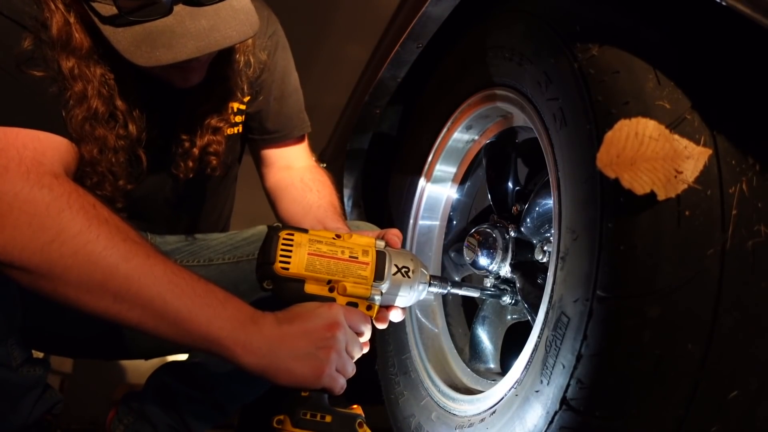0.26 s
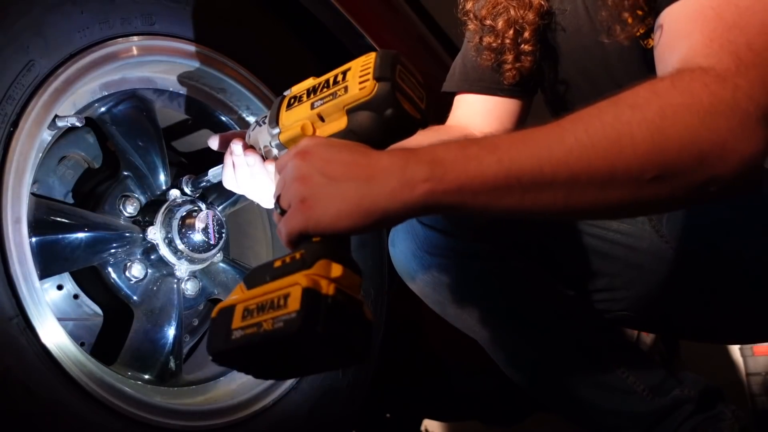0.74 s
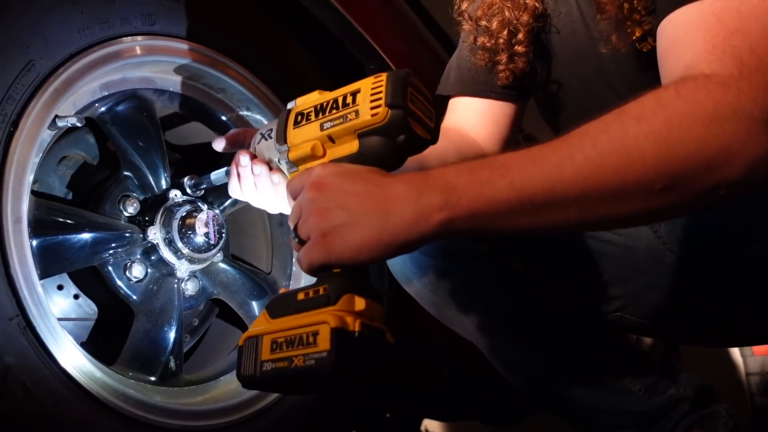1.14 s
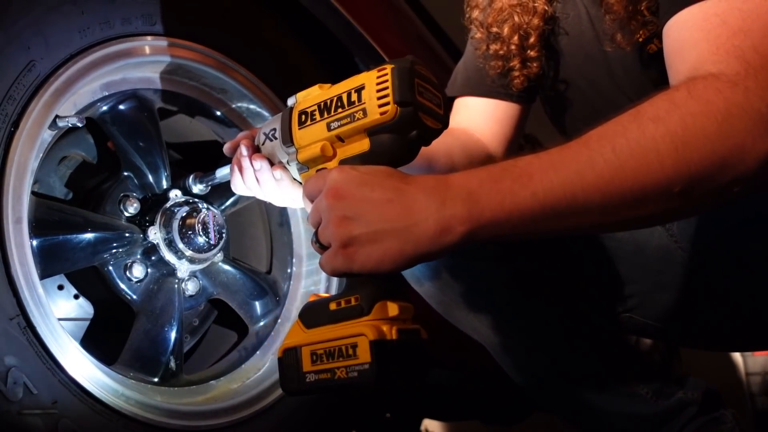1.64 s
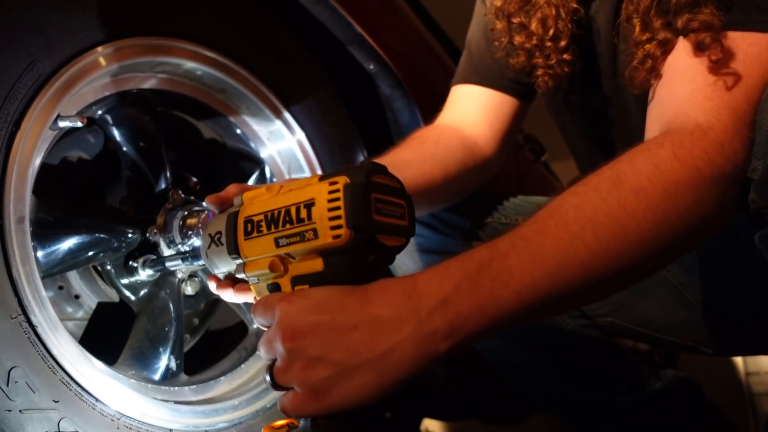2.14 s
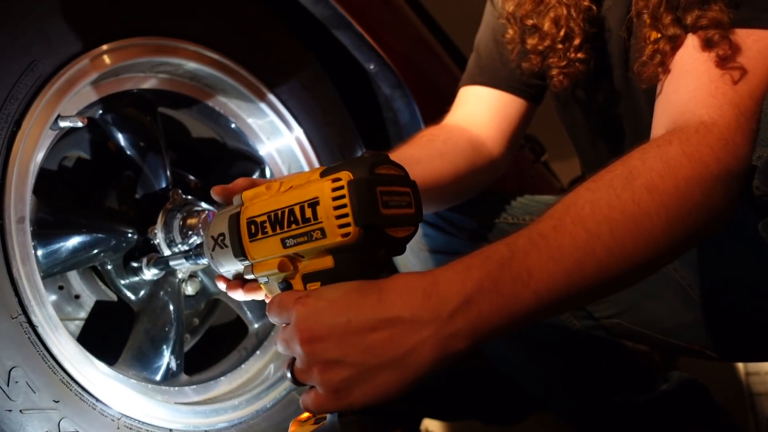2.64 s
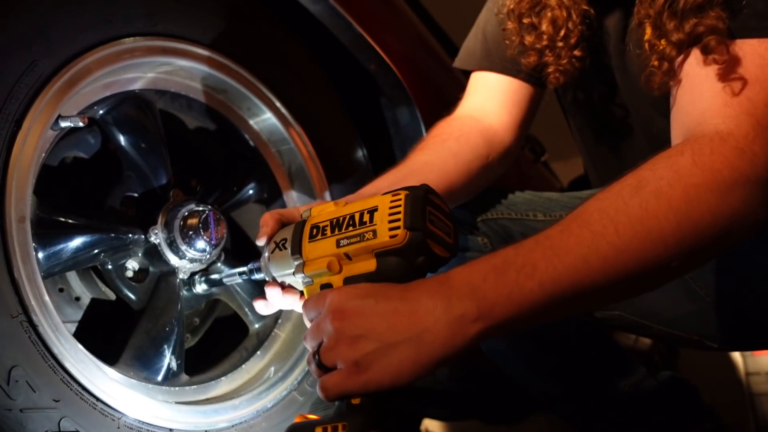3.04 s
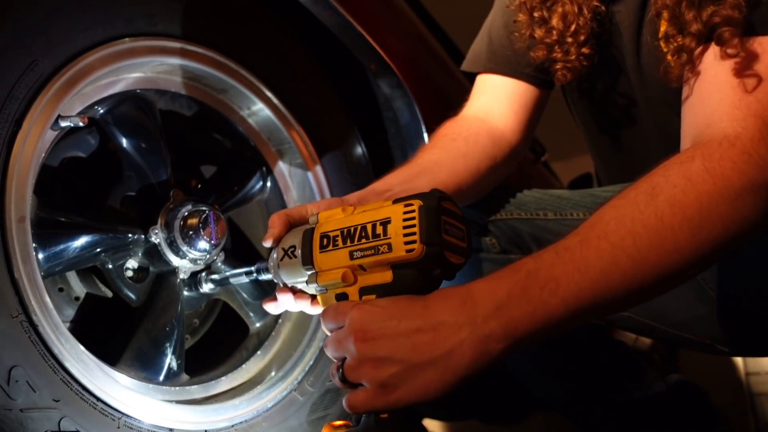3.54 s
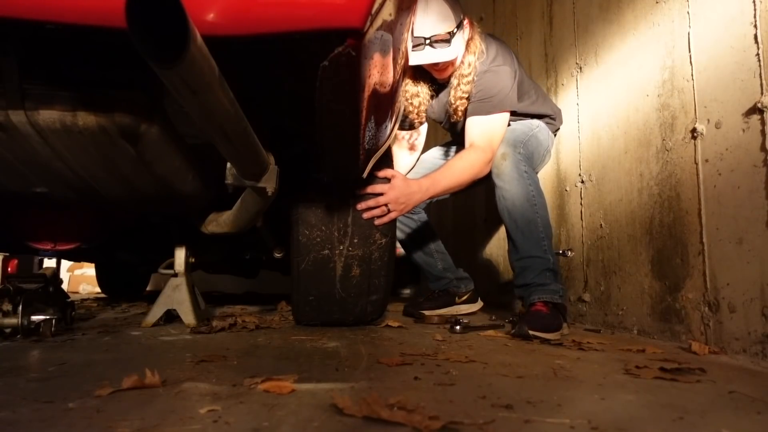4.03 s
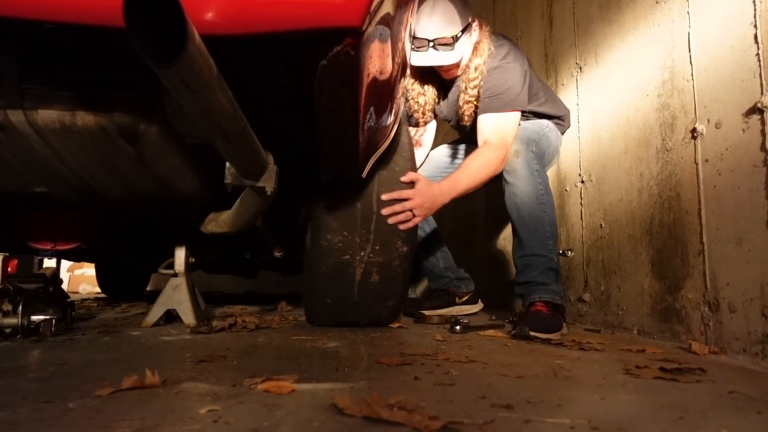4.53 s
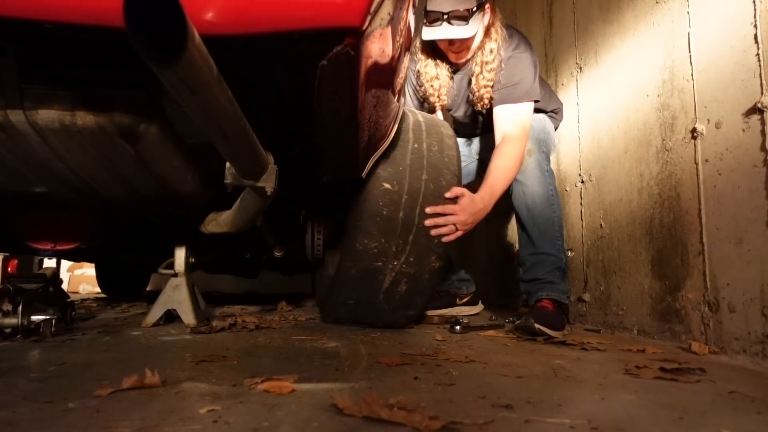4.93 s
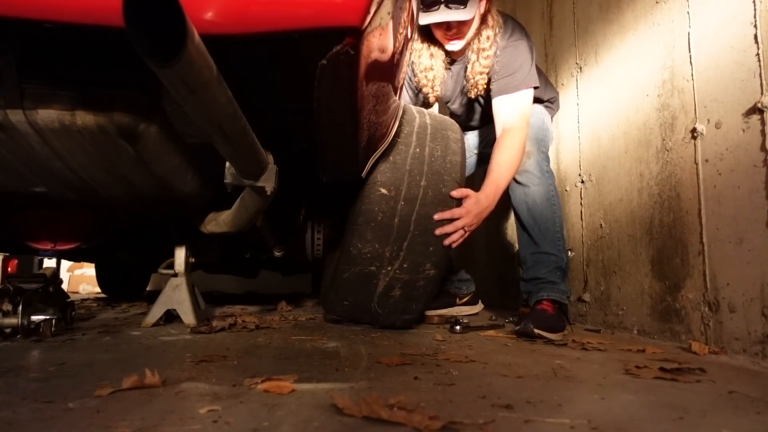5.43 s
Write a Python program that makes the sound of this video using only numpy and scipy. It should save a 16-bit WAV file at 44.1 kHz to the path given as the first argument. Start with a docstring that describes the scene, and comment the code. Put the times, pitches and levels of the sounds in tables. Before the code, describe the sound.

A cordless impact wrench rattles wheel nuts loose in four loud bursts, then the tyre scrapes and thumps softly on concrete.

```python
"""A cordless impact wrench runs wheel nuts off in four bursts, each heard from a new spot, over a garage hum.
Shaped noise and knocks give the grind, rattle and tyre drumming; a loose socket knocks through the first burst.
Gear whine is sines and narrow noise at tooth-rate multiples, climbing as later nuts come free; ticks, rough rings,
whirr swells and brake squeals are short noise. Then the wheel drops off its studs: gritty noise scrapes, the tyre
groans on low sines, bumps as decaying modes and is dragged over concrete with small metal rings."""
import sys
import numpy as np
from scipy import signal
from scipy.fft import rfft, irfft
from scipy.io import wavfile
from scipy.ndimage import uniform_filter1d

SR = 44100
rng = np.random.default_rng(int(sys.argv[2]) if len(sys.argv) > 2 else 0)


def linear_from_db(decibels):
    """Turn decibels (scalar or array-like) into linear amplitude factors; 0 gives 1."""
    return 10 ** (np.asarray(decibels, float) / 20)


def log_audio(samples):
    """Write samples as a 16-bit WAV file to the path given in sys.argv[1]."""
    # one column per channel
    frames = np.atleast_2d(samples).T
    # limit to full scale, then quantise
    limited = np.clip(frames, -1, 1)
    pcm = np.round(limited * 32767).astype(np.int16)
    wavfile.write(sys.argv[1], SR, pcm)


N = 250488  # samples

# loose socket in the first burst: (turn rate [1/s], first knock [s], mean levels of the six flats [dB])
LOOSE_SOCKET = (28.4, .0082, (0, 0, -4, -4, -8, -8))


def evened(x):
    """Scales to rms 1."""
    return x / np.sqrt(np.mean(x ** 2) + 1e-20)


def add(mix, s, sound):
    """Mixes a sound in at time s, cut at the end of the mix."""
    part = mix[round(s * SR):][:len(sound)]
    part += sound[:len(part)]


def colour(x, points, peaks=()):
    """Minimum-phase filter: spectrum from points, plus resonant humps."""
    hz = np.fft.rfftfreq(4096, 1 / SR)
    point_hz, point_db = np.transpose(points)
    db = np.interp(np.log(hz + 1), np.log(point_hz), point_db)
    for peak_hz, width_hz, over_db in peaks:
        db = db + over_db / (1 + (2 * (hz - peak_hz) / width_hz) ** 2)
    log_gain = np.log(linear_from_db(np.r_[db, db[-2:0:-1]]))
    spectrum = np.exp(np.conj(signal.hilbert(log_gain)))
    taps = np.fft.ifft(spectrum).real[:2048]
    return signal.oaconvolve(x, taps)[:len(x)]


def band(x, lo_hz, hi_hz):
    """One band of x with soft edges, at rms 1."""
    hz = np.fft.rfftfreq(len(x), 1 / SR) + 1
    loss = np.sqrt((1 + (lo_hz / hz) ** 12) * (1 + (hz / hi_hz) ** 12))
    return evened(irfft(rfft(x) / loss, len(x)))


def resonate(x, hz, width_hz):
    """Resonance on a fixed or moving pitch: shift to zero, smooth twice, shift back; rms 1."""
    turn = np.exp(2j * np.pi * np.cumsum(hz * np.ones(len(x))) / SR)
    r = np.exp(-np.pi * width_hz / SR)
    smooth = signal.lfilter([1], np.convolve([1, -r], [1, -r]), x / turn)
    return evened((turn * smooth).real)


def curves(rows):
    """Start time, and the other columns interpolated at sample rate."""
    s, *columns = np.transpose(rows)
    t = np.arange(s[0], s[-1], 1 / SR)
    return s[0], [np.interp(t, s, c) for c in columns]


def slow(count, seconds):
    """Noise smoothed over the given time, at rms 1."""
    return evened(uniform_filter1d(rng.standard_normal(count), round(seconds * SR)))


def grains(count, per_s, spread_db):
    """Sparse clicks of random sign, a few of them large; rms 1."""
    size = linear_from_db(spread_db * np.minimum(rng.exponential(1, count), 4))
    sign = rng.choice([-1., 1.], count)
    return evened(size * sign * (rng.random(count) < per_s / SR))


def rough_ring(length_s, hz, width_hz, db):
    """Narrow noise that swells and fades."""
    noise = rng.standard_normal(round(length_s * SR))
    return linear_from_db(db) * resonate(noise, hz, width_hz) * signal.windows.tukey(len(noise), .6)


def spot():
    """Balance, extra width and hum level at sample rate, stepping at each move."""
    # (from [s], left over right [dB], extra width [dB], garage hum [dB])
    spot_rows = [(0, -.7, -2, -38.5), (0.849, -1.6, 3.5, -45.5), (1.76, -1, 3, -46.5),
                 (2.86, -1, 3.5, -44.5), (3.68, -2.5, 4.5, -44)]
    s, *columns = np.transpose(spot_rows)
    return np.array(columns)[:, np.searchsorted(s, np.arange(N) / SR, "right") - 1]


def air():
    """Garage hum: coloured noise with a few fan-like bands, level set by the spot."""
    # spectrum shape: (frequency [Hz], relative density [dB per Hz])
    hum_shape = [(24, -55), (40, -24), (96, -10.5), (162, -5), (325, -9.5), (359, -11), (450, -9),
                 (549, -8), (760, -12), (861, -12.5), (1190, -17), (1960, -24), (2640, -19.5), (3230, -26),
                 (15600, -42)]
    # humps: (centre [Hz], width [Hz], height over the shape [dB])
    hum_humps = [(226, 300, 3.5), (445, 41, 6.5), (880, 220, 8), (2314, 300, 7), (2700, 103, 11),
                 (5060, 1500, 7.5)]
    _, _, hum_db = spot()
    return linear_from_db(hum_db) * evened(colour(rng.standard_normal(N), hum_shape, hum_humps))


def burst(k):
    """Grinding noise and knocks shake housing, rim and tyre; band levels follow the nut coming free."""
    # one table a burst: (time [s], housing rattle [dB], treble against its usual share [dB])
    level_rows = [
        [(0, -18, 2), (.03, -17.5, 0.5), (.62, -18, 0.5), (.64, -31, -17), (.7, -38, -14), (.76, -49, -22),
         (.84, -63, -22)],
        [(.852, -23.5, -18), (.884, -33.5, -26), (.896, -23, 7), (.93, -18.5, -4), (1.03, -19.5, -0.5),
         (1.1, -26, -23), (1.15, -19, -8), (1.25, -20.5, 1.5), (1.7, -19.5, 4.5), (1.744, -25, -1),
         (1.775, -93, -30)],
        [(1.866, -30, -17), (1.893, -35, -7), (1.897, -19.5, 2), (1.935, -23.5, -9), (1.966, -16.5, 2.5),
         (2.045, -17.5, -0.5), (2.17, -18, 3), (2.3, -21, -2), (2.65, -20, 2.5), (2.855, -26, 5)],
        [(2.855, -23, -4), (2.9, -21, -4), (2.963, -17.5, 0.5), (3.05, -19.5, 2.5), (3.5, -17, -1.5),
         (3.647, -19, 2), (3.665, -106, -29)],
    ]
    # tool colour from each spot: (frequency [Hz], relative density [dB per Hz])
    tool_colours = [
        [(24, -53), (40, -42), (158, -18.5), (229, -26.5), (342, -10.5), (607, -5.5), (760, 0.5), (1100, -7.5),
         (2330, -0.5), (2850, -2.5), (3070, -5.5), (3940, -6), (4580, -10.5), (9920, -9.5), (15600, -23)],
        [(24, -40), (40, -24), (150, -3.5), (473, -5), (779, 1.5), (1650, 2.5), (2010, 3), (2280, 2), (2710, 4),
         (3480, -2), (3850, 0), (4470, -10.5), (6330, -14), (11500, -25), (15600, -43)],
        [(24, -51), (40, -30), (103, -18), (166, -8), (266, -14), (450, -16), (523, -11), (819, -1),
         (1080, -4.5), (1690, 1.5), (2280, -0.5), (3480, -3.5), (5060, -12), (5730, -11.5), (15600, -36)],
        [(24, -55), (40, -26), (162, -4), (241, -12.5), (473, -12.5), (861, -1), (1080, -3.5), (1420, -1.5),
         (1690, 5), (1820, 2.5), (3480, -1.5), (6330, -13.5), (11500, -31), (13700, -39), (15600, -49)],
    ]
    # tyre, rim and housing resonances, one table a burst: (centre [Hz], width [Hz], height over colour [dB])
    resonances = [
        [(760, 48, -1), (2450, 220, 3), (2900, 110, 5), (3400, 30, 12.5), (3860, 64, 3.5)],
        [(155, 50, 9.5), (2700, 130, 5.5), (3250, 64, 7), (3840, 150, 0.5), (4670, 130, 2)],
        [(162, 59, 0), (255, 33, 2.5), (2550, 190, 2), (3500, 150, 1.5), (4560, 73, 6.5)],
        [(87, 17, -1), (176, 18, 11), (245, 21, 11.5), (559, 46, 9), (3300, 120, 1)],
    ]
    # edges of the tyre, rim, housing, whirr and fan bands: [Hz]
    band_edges_hz = [0, 300, 700, 5000, 7000, 20000]
    # stray knocks, one row a burst: (rate [1/s], level against the grind [dB])
    stray_knocks = [(400, -13), (600, -12.5), (700, -11.5), (700, -14.5)]
    # one row a burst: (rim [dB], motor whirr [dB], fan hiss [dB], tyre drumming [dB])
    band_shares = [(-17.5, -14, -12, -16), (-23, -6, -15, -18), (-15.5, -23, -11.5, -12),
                   (-17, -15.5, -12.5, -7)]
    # as the nut frees, one row a burst: (start [s], tyre fade [dB/s], whirr climb [dB/s])
    freeing_rows = [(.3, -6, 0), (1.2, -15, 1.5), (2.05, -12.5, 25.5), (3.15, -16, 5)]
    # hard blows through the tyre: (time [s], extra drumming [dB])
    thump_rows = [(.64, 24), (1.02, 7), (1.9, 11), (2.045, 4), (2.186, 5), (2.348, 1.5), (2.66, 9.5),
                  (2.865, 7), (3.056, 5.5)]
    rim_follows_tyre, whirr_follows_treble = 0.64, 0.39  # dB per dB

    s, (rattle_db, treble_db) = curves(level_rows[k])
    n = len(treble_db)
    t = s + np.arange(n) / SR
    rim_db, whirr_db, fan_db, tyre_db = band_shares[k]
    free_s, tyre_fade, whirr_climb = freeing_rows[k]
    free = np.maximum(t - free_s, 0)
    treble_db = treble_db + 2 * slow(n, 0.039)  # flicker

    per_s, stray_db = stray_knocks[k]
    hits = linear_from_db(stray_db) * grains(n, per_s, 2.5)
    if k == 0:
        hits = hits + socket(n)
    fade = linear_from_db(-60 * np.arange(300) / SR / 0.011)  # each knock crunches for a few ms, never twice alike
    crunch = signal.oaconvolve(abs(hits), fade / np.linalg.norm(fade))[:n]
    drive = rng.standard_normal(n) + crunch * resonate(rng.standard_normal(n), 3650, 5900)
    body = colour(drive, tool_colours[k], resonances[k])

    for at, extra_db in thump_rows:
        since = t - at
        tyre_db = tyre_db + extra_db * (since > 0) * linear_from_db(-60 * abs(since) / 0.28)  # the extra dB dies away
    tyre_db = tyre_db + tyre_fade * free + 1.5 * slow(n, 0.021)  # lumpy drumming
    rim_db = rim_db + rim_follows_tyre * tyre_fade * free
    whirr_db = whirr_db + whirr_climb * free + whirr_follows_treble * treble_db
    levels_db = [tyre_db, rim_db, 0, whirr_db, fan_db + treble_db]
    bands = zip(levels_db, band_edges_hz, band_edges_hz[1:])
    return s, linear_from_db(rattle_db) * sum(linear_from_db(db) * band(body, lo, hi) for db, lo, hi in bands)


def gears(k):
    """Tooth contact: whistles on multiples of the tooth rate, clean low down, fuzzy higher up."""
    # one table a burst: (time [s], mean tooth rate [Hz], whine [dB])
    mesh_rows = [
        [(0, 760, -35), (.3, 760, -38.5), (.5, 760, -44), (.64, 760, -58)],
        [(1.15, 688, -55), (1.2, 740, -27.5), (1.25, 787, -28), (1.33, 784, -27), (1.4, 865, -31),
         (1.47, 925, -28.5), (1.6, 1003, -33), (1.75, 977, -48)],
        [(2.0, 785, -35), (2.15, 808.5, -38), (2.28, 821, -31), (2.36, 838, -31), (2.43, 855, -39.5),
         (2.52, 928, -33.5), (2.6, 924, -29.5), (2.7, 955, -42), (2.85, 984, -43)],
        [(2.99, 760, -29), (3.04, 815, -26), (3.15, 840, -23.5), (3.3, 867, -24), (3.37, 880, -30),
         (3.5, 892, -36), (3.59, 905, -45), (3.65, 953, -32)],
    ]
    # levels of tooth-rate multiples 1-7, one row a burst: [dB]
    multiples_db = [(5.5, -7, -14, 5.5, -21, -9, 2), (-5.5, 2.5, -0.5, 1, 2, -5, -6),
                    (-7.5, 6.5, -6.5, -9, -6, -4.5, -7), (-9.5, 5, -4, -7, -33, -5, -7)]
    # whine swells as a thread binds: (centre [s], extra level [dB])
    surge_rows = [(1.25, 2), (2.345, 8), (2.461, 15.5), (2.516, 11.5), (2.575, 5), (3.412, 15), (3.472, 13),
                  (3.525, 13), (3.572, 24.5)]
    # rms share by which the load shakes the speed, one a burst
    wobble_share = (.025, .024, .02, .014)
    clean, fuzz_width_hz, surge_width_s = .8, 35, 0.021  # fuzz width per multiple

    s, (hz, db) = curves(mesh_rows[k])
    n = len(hz)
    t = s + np.arange(n) / SR
    db = db + 2.2 * slow(n, 400 / SR)  # throb
    for at, extra_db in surge_rows:
        db = db + extra_db * np.exp(-(2 * (t - at) / surge_width_s) ** 2)
    wobble = 1 + wobble_share[k] * slow(n, 250 / SR)
    phase = 2 * np.pi * np.cumsum(hz * wobble) / SR
    whine = np.zeros(n)
    for j, multiple_db in enumerate(multiples_db[k], start=1):
        tone = clean ** (j / 2) * np.sin(j * phase)
        fuzz = (1 - clean) * resonate(rng.standard_normal(n), j * hz, fuzz_width_hz * j)
        whine += linear_from_db(multiple_db) * evened(tone + fuzz)
    return s, whine * linear_from_db(db) * signal.windows.tukey(n, .05)


def socket(count):
    """Six flats knock in turn as impulses, with small chance in time and level."""
    turns_per_s, first_s, flats_db = LOOSE_SOCKET
    k = np.arange(108)
    at_s = first_s + k / (6 * turns_per_s) + .0003 * rng.standard_normal(len(k))
    train = np.zeros(count)
    train[(at_s * SR).astype(int)] = linear_from_db(np.array(flats_db)[k % 6] + 2.0 * rng.standard_normal(len(k)))
    return linear_from_db(-5.0) * evened(train)


def snaps():
    """The second flat snaps brightly once a turn of the loose socket: decaying high noise."""
    turns_per_s, first_s, _ = LOOSE_SOCKET
    out, t = np.zeros(N), np.arange(1000) / SR
    for k, chance in enumerate(rng.standard_normal(18)):
        shape_db = -17.5 + 2.0 * chance - 60 * t / .012  # t60 12 ms
        snap = band(rng.standard_normal(len(t)), 6600, 12000) * linear_from_db(shape_db)
        add(out, first_s + (k + 1 / 6) / turns_per_s, snap)
    return out


def metal_rings():
    """Small metal rings: narrow noise dying away exponentially."""
    # (start [s], pitch [Hz], initial level [dB], t60 [s])
    ring_rows = [(.635, 900, -31, 0.55), (5.345, 1540, -42, 0.35), (5.41, 1600, -52, .25)]
    out, t = np.zeros(N), np.arange(SR // 2) / SR
    for s, hz, db, t60_s in ring_rows:
        add(out, s, linear_from_db(db - 60 * t / t60_s) * resonate(rng.standard_normal(len(t)), hz, 200))
    return out


def knocks():
    """Trigger clicks and hard knocks: a sharp metal tick with a short noisy ring, duller when softer."""
    # (time [s], relative level [dB], centre [Hz])
    knock_rows = [(.7696, -25, 2000), (0.8246, -27, 1940), (0.8555, -13, 2730), (0.894, -5.5, 2680),
                  (1.865, -10.5, 3140), (1.8951, -18, 1630), (1.923, -1, 2120), (1.939, -4.5, 1960),
                  (1.952, -6, 3000), (2.0634, -14, 3500), (2.0758, -7, 2480), (2.0873, -7, 4000),
                  (2.1457, -10, 3250), (2.4376, -27, 1950), (2.4808, -20, 1960), (2.502, -9, 1830),
                  (2.8859, -6.5, 1650), (2.9442, -4.5, 4170), (3.4549, -8, 1800), (3.5064, -22, 1770),
                  (3.698, -30, 2510), (3.7072, -28, 2590), (3.981, -34, 2600), (4.0425, -35, 2000),
                  (4.4187, -29, 1400), (5.093, -30, 2710)]
    out, t = np.zeros(N), np.arange(4000) / SR
    tick_t60_s, ring_t60_s = .007, 0.025
    for s, db, hz in knock_rows:
        noise = rng.standard_normal(len(t))
        treble = linear_from_db(-18 + 0.89 * db) * band(noise, 6000, 8000)
        tone = resonate(noise, hz, 2240) + treble
        shape = linear_from_db(-60 * t / tick_t60_s) + 0.26 * linear_from_db(-60 * t / ring_t60_s)
        add(out, s, 0.7 * linear_from_db(db) * tone * shape)
    return out


def rings_and_whirr_swells():
    """Rough housing rings and swells of high gear whirr: short narrow noise, width a tenth of the pitch."""
    # (start [s], length [s], pitch [Hz], level [dB])
    swell_rows = [(0.854, 0.041, 3400, -24.5), (0.906, 0.056, 2760, -19), (0.934, 0.042, 1900, -20.5),
                  (0.944, .038, 1290, -24), (.998, 0.018, 1300, -23), (.999, 0.036, 2000, -22),
                  (1.006, 0.04, 2700, -22), (1.134, 0.053, 2780, -20), (1.135, 0.068, 2000, -23.5),
                  (1.323, 0.023, 3770, -24), (1.359, 0.077, 2550, -22.5), (1.463, 0.058, 3793, -23),
                  (1.905, 0.068, 2085, -24.5), (2.009, 0.044, 1420, -22.5), (2.104, 0.135, 3400, -26),
                  (2.501, 0.15, 5540, -26), (2.674, 0.037, 5860, -20.5), (2.72, 0.074, 5810, -29),
                  (2.929, 0.073, 9700, -29), (3.009, 0.058, 2350, -21), (3.353, 0.061, 4700, -23.5),
                  (3.44, 0.15, 5680, -25.5)]
    out = np.zeros(N)
    for s, length_s, hz, db in swell_rows:
        add(out, s, rough_ring(length_s, hz, 0.1 * hz, db))
    return out


def brake():
    """The motor brake squeals as the trigger is let go: a rough ring and its octave."""
    # (start [s], length [s], pitch [Hz], level [dB], octave level [dB])
    squeal_rows = [(1.709, 0.04, 6160, -20.5, -27), (2.755, 0.055, 6040, -20.5, -31.5),
                   (3.559, 0.089, 6000, -24, -34)]
    out = np.zeros(N)
    for s, length_s, hz, db, octave_db in squeal_rows:
        add(out, s, rough_ring(length_s, hz, 490, db) + rough_ring(length_s, 2 * hz, 1200, octave_db))
    return out


def drag():
    """Rubber dragged over grit: coloured noise and grains plus a dull band, one swell a stroke."""
    # one row a stroke: (start [s], rise [s], hold [s], relative scrape level [dB], dull share [dB])
    stroke_rows = [(4.191, 0.13, .11, -43.5, 3), (4.575, 0.1, 0.04, -31.5, -13.5),
                   (4.715, 0.042, 0.028, -27, -16.5), (5.077, 0.024, .015, -35.5, -7),
                   (5.247, 0.03, 0.18, -53, -8), (5.332, 0.019, .02, -54.5, -8)]
    # scrape spectrum: (frequency [Hz], relative density [dB per Hz])
    grit_shape = [(590, -17), (1000, -0.5), (1260, -0.5), (1700, 4.5), (2010, 1.5), (2390, 4), (4400, 0.5),
                  (4930, 0.5), (6570, -3), (7810, -3), (15600, -22)]
    out, t = np.zeros(N), np.arange(SR) / SR
    stop_t60_s, tail_db, tail_t60_s = .16, -11.5, 0.76
    for s, rise_s, hold_s, db, dull_db in stroke_rows:
        after = np.maximum(t - rise_s - hold_s, 0)
        stop = linear_from_db(-60 * after / stop_t60_s) + linear_from_db(tail_db - 60 * after / tail_t60_s)
        swell = np.minimum(t / rise_s, 1) ** 0.82
        rub = rng.standard_normal(SR) + .5 * grains(SR, 1500, 6.7)
        rub = evened(colour(rub, grit_shape)) + linear_from_db(dull_db) * band(rub, 240, 1250)
        add(out, s, linear_from_db(db) * swell * stop * rub)
    return out


def groan():
    """The tyre shudders twice on the floor: a low sine with some narrow noise."""
    # (start [s], rise [s], hold [s], pitch [Hz], relative level [dB])
    groan_rows = [(4.279, 0.064, 0.011, 164.8, -13.5), (4.364, 0.0136, 0.0374, 167, -16)]
    out, t = np.zeros(N), np.arange(SR // 2) / SR
    from_db, t60_s = -26, 0.032
    for s, rise_s, hold_s, hz, db in groan_rows:
        shudder = np.sin(2 * np.pi * hz * t) + 0.2 * resonate(rng.standard_normal(len(t)), 235, 100)
        rise_db = from_db * np.maximum(1 - t / rise_s, 0)
        fall_db = -60 * np.maximum(t - rise_s - hold_s, 0) / t60_s
        onset = np.minimum(t / 0.004, 1)
        add(out, s, np.sqrt(2) * linear_from_db(db + rise_db + fall_db) * shudder * onset)
    return out


def bumps():
    """The tyre bumps on the floor: decaying sine modes, each detuned by chance."""
    # (time [s], relative level [dB])
    bump_rows = [(4.39, -30.5), (4.411, -25.5), (4.421, -29.5), (4.446, -33.5), (5.1, -50), (5.478, -46),
                 (5.512, -54), (5.532, -51)]
    # tyre modes: (nominal pitch [Hz], relative level [dB], t60 [s])
    tyre_modes = [(88.4, -5.5, 0.42), (174, 2.5, 0.38), (222, 2.5, 0.52), (260, -1, 0.35),
                  (450, -3.5, 0.26), (797, -1, .08), (1210, 2.5, 0.085), (2000, -8, .04)]
    out, t = np.zeros(N), np.arange(SR // 2) / SR
    for s, db in bump_rows:
        for hz, mode_db, t60_s in tyre_modes:
            tone = np.sin(2 * np.pi * hz * rng.uniform(0.9, 1.03) * t)
            add(out, s, linear_from_db(db + mode_db - 60 * t / t60_s) * tone)
    return out


def spread(mid):
    """Stereo: random-phase reflections differ left and right; treble leans by the spot's balance."""
    # reflections: (frequency [Hz], side against mid before the spot's extra width [dB])
    side_shape = [(60, -56), (150, -59), (380, -17), (950, -18.5), (2380, -14.5), (5980, -13), (15000, -10)]
    z = signal.stft(mid, nperseg=512)[2]
    scattered = signal.istft(z * np.exp(2j * np.pi * rng.random(z.shape)), nperseg=512)[1][:N]
    side = colour(np.sqrt(2) * scattered, side_shape)
    left_db, wide_db, _ = spot()
    treble = signal.sosfilt(signal.butter(1, 900, "high", fs=SR, output="sos"), mid)  # bass has no direction
    lean = (linear_from_db(left_db) - 1) / (linear_from_db(left_db) + 1)
    side = side * linear_from_db(wide_db) + treble * lean
    return np.array([mid + side, mid - side])


def scene():
    """Sums all sources near the centre, then spreads them to stereo."""
    mid = air() + snaps() + metal_rings() + knocks() + rings_and_whirr_swells() + brake()
    mid += drag() + groan() + bumps()
    for k in range(4):
        add(mid, *burst(k))
        add(mid, *gears(k))
    return spread(mid)


def top_cut(x):
    """Nothing passes above the cut-off."""
    return signal.sosfilt(signal.butter(12, 15700, fs=SR, output="sos"), x)


def record(dry):
    """The microphone loses deep bass and rounds off the highest peaks; a low-pass ends the treble."""
    thin = signal.sosfilt(signal.butter(2, 55, "high", fs=SR, output="sos"), dry)
    rounded = 0.83 * np.tanh(thin / 0.94)
    low_pass = signal.firwin(1023, 15650, window=("kaiser", 9), fs=SR)[None]
    mix = signal.oaconvolve(rounded, low_pass, "same")
    return top_cut(mix)


dry = scene()
out = record(dry)
log_audio(out)
```